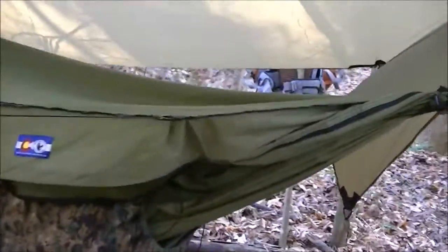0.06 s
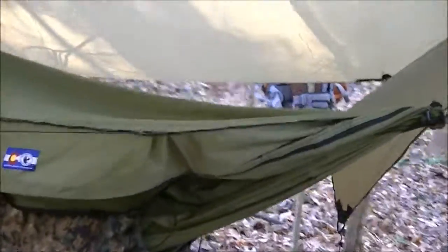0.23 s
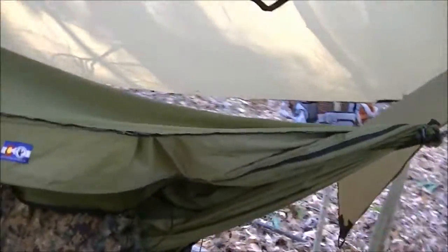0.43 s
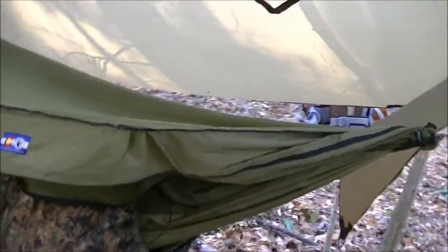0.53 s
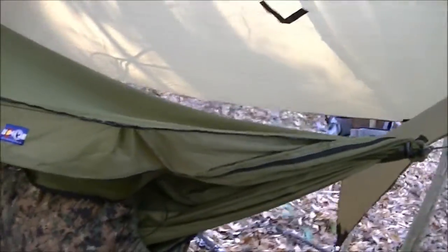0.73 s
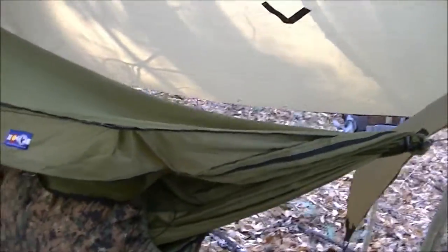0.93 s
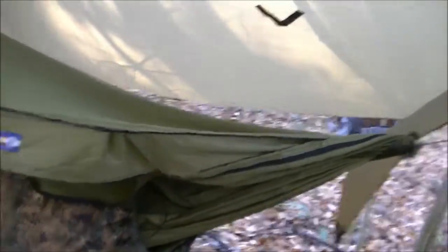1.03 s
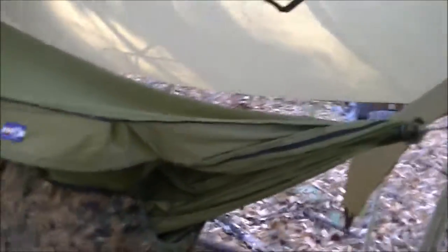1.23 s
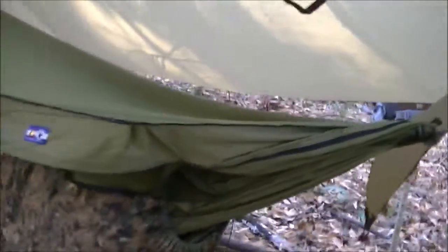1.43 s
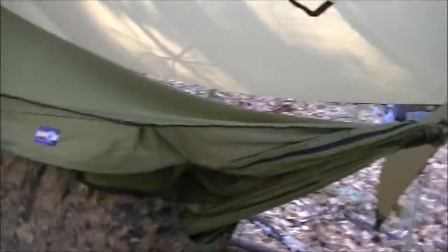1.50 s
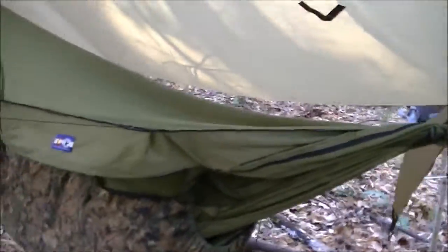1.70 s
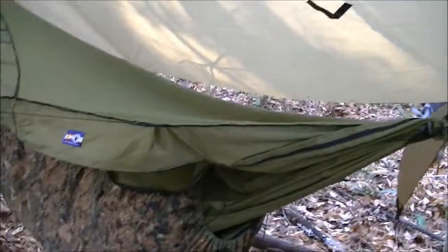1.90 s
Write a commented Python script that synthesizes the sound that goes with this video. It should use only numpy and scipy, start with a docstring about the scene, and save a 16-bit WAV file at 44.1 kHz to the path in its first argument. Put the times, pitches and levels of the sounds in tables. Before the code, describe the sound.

Dry leaves crunch and rustle underfoot, small twigs snapping and ticking, over a faint woodland hush

```python
"""Footsteps in dry leaf litter in quiet woods, heard by a hand-held camera with one microphone.
Under each step thousands of random leaf cracks mix with rubbing noise into coarse crunch and fine rustle.
Twigs and stiff leaves snap as short damped tones and tick high up, then scatter off the ground.
A thin unsteady rubbing tone sounds early on. Filtered noise makes the camera body's rumble in the hand,
a low hum and the hush of the woods; damped low sines are soft bumps on the body."""
import sys
import numpy as np
from scipy import signal
from scipy.fft import rfft, irfft, next_fast_len
from scipy.io import wavfile
from scipy.ndimage import uniform_filter1d, map_coordinates

SR = 44100
rng = np.random.default_rng(int(sys.argv[2]) if len(sys.argv) > 2 else 0)


def wrap_up_sound(samples):
    """Save the sound to the file named by the first command line argument, as 16-bit audio."""
    columns = np.atleast_2d(samples).T
    # keep every value between -1 and 1, then stretch to whole-number steps
    tamed = np.clip(columns, -1, 1)
    steps = np.round(tamed * 32767).astype(np.int16)
    wavfile.write(sys.argv[1], SR, steps)


N = 85995
SNAP_RISE_S = 0.00027  # time constant of the onset of snaps, cracks and ticks


def amp(db):
    """Gain of a level in dB."""
    return 10 ** (np.asarray(db) / 20)


def unit(x):
    """Scaled to rms 1."""
    return x / np.sqrt(np.mean(x ** 2) + 1e-20)


def along(points, hz):
    """Value at each frequency, from (Hz, value) points joined on a log axis."""
    point_hz, value = np.transpose(points)
    return np.interp(np.log(hz + 1), np.log(point_hz + 1), value)


def curves(rows):
    """One value per sample for each column after the time."""
    time_s, *columns = np.transpose(rows)
    return [np.interp(np.arange(N) / SR, time_s, column) for column in columns]


def wobble(rate):
    """A smooth random curve, rate knots a second."""
    knots = rng.standard_normal(N // 20)
    return map_coordinates(knots, [np.arange(N) * rate / SR])


def filtered(x, response):
    """x shaped by a gain for each frequency, without phase shift."""
    padded = next_fast_len(N + 8192)
    gain = response(np.fft.rfftfreq(padded, 1 / SR))
    return irfft(rfft(x, padded) * gain, padded)[..., :N]


def shaped_noise(spectrum):
    """Noise at rms 1 whose spectrum follows (Hz, dB) points."""
    return unit(filtered(rng.standard_normal(N), lambda hz: amp(along(spectrum, hz))))


def pings(start_s, size, hz, t60_s, rise_s, count):
    """Damped sines of count samples, with a soft onset, summed at their start times."""
    t = np.arange(count) / SR
    decay = amp(-60 * t / np.maximum(t60_s, 2e-4)[:, None])
    onset = 1 - np.exp(-t / rise_s)
    ring = size[:, None] * np.sin(2 * np.pi * hz[:, None] * t) * (decay * onset)
    at = np.round(start_s * SR).astype(int)[:, None] + np.arange(count)
    return np.bincount(at.ravel(), ring.ravel(), N + count)[:N]


def crackle(count, low_hz, high_hz, cycles, spread_db, rub_db, clump_db):
    """Leaf cracks of random time, pitch and size, evened in spectrum, over rubbing noise that clumps."""
    u = rng.random((count, 4))
    start_s = u[:, 0] * (N - 1) / SR
    hz = low_hz * (high_hz / low_hz) ** u[:, 1]
    sign = np.sign(u[:, 3] - .5)
    size = amp(-spread_db * np.log(u[:, 2] + 0.06)) * sign * hz  # few large, many small
    cracks = pings(start_s, size, hz, cycles / hz, rise_s=1e-4, count=256)
    spectrum = rfft(cracks)
    smooth = np.sqrt(uniform_filter1d(np.abs(spectrum) ** 2, size=801) + 1e-9)
    even = unit(irfft(spectrum / smooth, N))
    rubbing = amp(rub_db) * rng.standard_normal(N)
    return unit((even + rubbing) * amp(clump_db * wobble(54.57)))


def leaves():
    """Coarse crunch and fine rustle of crushed leaves, each following the pressure of the feet."""
    # pressure of the feet on the litter: time_s, coarse_level_db, fine_level_db
    tread = [(0, -50, -56), (.1, -58.5, -56), (.168, -56.5, -61.5), (.195, -61.5, -64.5),
             (.238, -45.5, -42.5), (.244, -45, -49), (.249, -44.5, -56), (.263, -54, -48.5),
             (.27, -48, -58), (.285, -57, -58), (.308, -48, -52.5), (.32, -40.5, -42.5),
             (.345, -41.5, -39.5), (.385, -40, -45.5), (.46, -52, -53), (.55, -48.5, -49), (.64, -50, -48),
             (.71, -52, -46), (.745, -42, -41.5), (.78, -48.5, -45.5), (.82, -42.5, -42.5),
             (.87, -48.5, -45.5), (.888, -39, -37), (.955, -32, -31), (.98, -36, -33.5),
             (1.01, -47.5, -45.5), (1.1, -53.5, -53), (1.19, -46.5, -49.5), (1.25, -41, -42.5),
             (1.29, -39.5, -42.5), (1.31, -42, -47.5), (1.38, -38.5, -39.5), (1.42, -32.5, -34),
             (1.455, -40, -41), (1.49, -49, -49.5), (1.55, -46, -47.5), (1.63, -47, -47.5),
             (1.7, -46, -51.5), (1.8, -52, -52), (1.87, -53.5, -60), (1.95, -54, -49)]
    # spectrum of the coarse crunch: frequency_hz, relative_level_db
    coarse_spectrum = [(150, -29), (250, -22), (291, -23.5), (565, -6.5), (1150, -2.5), (1460, -3),
                       (3220, -4), (5000, -3), (6500, 5), (11000, -120)]
    # spectrum of the fine rustle: frequency_hz, relative_level_db
    fine_spectrum = [(2000, 13), (3000, 1.5), (4500, -0.5), (6000, -1), (7700, -5.5), (11000, -9.5),
                     (14000, -14.5), (15900, -18.5)]
    split_hz = 3730  # crunch below, rustle above

    def above(hz):
        """Share of the power that goes to the rustle."""
        return 1 / (1 + (split_hz / (hz + 1)) ** 6)

    coarse_db, fine_db = curves(tread)
    coarse = crackle(count=2500, low_hz=432, high_hz=5260, cycles=5.8, spread_db=2.5, rub_db=-2, clump_db=2.0)
    fine = crackle(count=6000, low_hz=2380, high_hz=13900, cycles=5.2, spread_db=5.0, rub_db=0.5, clump_db=1.0)
    coarse = unit(filtered(coarse, lambda hz: amp(along(coarse_spectrum, hz)) * np.sqrt(1 - above(hz))))
    fine = unit(filtered(fine, lambda hz: amp(along(fine_spectrum, hz)) * np.sqrt(above(hz))))
    return amp(coarse_db) * coarse + amp(fine_db) * fine


def snaps():
    """Each snap rings a body tone and an overtone, with a crack of ten short pings spread over the band."""
    # snapping twigs and stiff leaves, levels nominal before the onset and the low cut:
    # start_s, level_db, body_hz, body_t60_s, overtone_hz, overtone_level_db (over the body)
    snap_list = [(.161, -44, 1330, .006, 2600, -8), (.176, -29.5, 1750, 0.011, 2770, -14),
                 (.236, -29.5, 1770, .012, 2980, -4), (.317, -39, 1010, 0.0051, 2230, 1.5),
                 (.348, -21.5, 2240, 0.0032, 3880, 5), (.373, -35, 1310, 0.0045, 3030, 12),
                 (.408, -27, 1500, 0.0046, 2600, 4), (.52, -35, 1870, 0.0069, 3500, -4),
                 (.5995, -13, 1930, 0.0022, 3530, 5.5), (0.601, -27.5, 930, 0.0042, 6260, -1),
                 (.663, -36, 5060, 0.0041, 9000, 0), (.864, -31, 4970, 0.0068, 7000, -8),
                 (.885, -19.5, 2920, 0.0067, 5370, 1), (1.035, -32, 1300, 0.0063, 1900, -1),
                 (1.12, -22, 1350, 0.0031, 2600, 6), (1.123, -28.5, 5060, 0.0048, 7950, -2),
                 (1.247, -24, 1970, .005, 3480, -15), (1.284, -25, 2600, 0.0074, 1500, -8),
                 (1.368, -21, 1700, 0.0069, 3000, -17), (1.385, -24, 1850, 0.01, 3180, -21),
                 (1.3975, -32, 1700, 0.008, 4850, 12.5), (1.4012, -20.5, 1540, 0.0081, 2400, 6),
                 (1.409, -17.5, 1090, 0.0023, 2500, 5), (1.4135, -23, 1450, 0.018, 2640, -5),
                 (1.4165, -17.5, 1800, 0.0034, 2800, 1), (1.419, -15, 1850, 0.0097, 2840, -5),
                 (1.4245, -23, 2550, 0.01, 6120, 1.5), (1.4495, -18, 1900, .008, 1000, -4),
                 (1.472, -38, 946, 0.023, 1520, -5), (1.546, -26, 2800, 0.0069, 5500, -3),
                 (1.618, -23.5, 2900, 0.0027, 7040, 5.5), (1.683, -29, 2000, 0.0049, 3020, 1),
                 (1.724, -28.5, 1800, .004, 3500, -3), (1.769, -25, 3050, 0.005, 1920, -12),
                 (1.793, -34, 3540, 0.0056, 2000, -7)]
    crack_db, crack_tilt_db, crack_t60_s = -13, -.6, 0.0032  # level over the body; tilt per ping
    crack_low_hz, crack_step = 800, 1.3  # lowest pitch; pitch ratio from ping to ping

    start_s, db, hz, t60_s, over_hz, over_db = np.transpose(snap_list)
    body = pings(start_s, amp(db), hz, t60_s, SNAP_RISE_S, count=1500)
    overtone = pings(start_s, amp(db + over_db), over_hz, 0.74 * t60_s, SNAP_RISE_S, count=1500)
    x = body - overtone
    crack_t60s = np.full(len(start_s), crack_t60_s)
    draws = rng.random((len(start_s), 10, 2)).transpose(1, 2, 0)
    for k, (detune, coin) in enumerate(draws):
        crack_hz = np.minimum(crack_low_hz * crack_step ** (k + detune), 15000)
        size = amp(db + crack_db + crack_tilt_db * k) * np.sign(coin - .5)
        x = x + pings(start_s, size, crack_hz, crack_t60s, SNAP_RISE_S, count=300)
    return x


def ticks():
    """Thin high ticks, each four short damped sines at randomly detuned pitches."""
    # high ticks, level nominal and each sine at half of it: start_s, level_db
    tick_list = [(0.2109, -34), (0.387, -25), (0.5985, -30), (1.1209, -32), (1.5439, -39), (1.6014, -35),
                 (1.6162, -32), (1.6985, -31), (1.729, -42), (1.7366, -31), (1.7684, -28.5), (1.7804, -37),
                 (1.8264, -57), (1.8886, -33.5), (1.9106, -37), (1.9275, -43)]
    tick_hz, tick_t60_s = 11600, 0.0035  # pitch before ratio and detuning
    start_s, db = np.transpose(tick_list)
    t60s = np.full(len(start_s), tick_t60_s)
    x = np.zeros(N)
    for ratio in (.8, .93, 1.08, 1.2):
        hz = tick_hz * ratio * (0.9 + 0.12 * rng.random(len(start_s)))
        x = x + pings(start_s, amp(db) / 2, hz, t60s, SNAP_RISE_S, count=300)
    return x


def off_the_ground(x):
    """Adds a short noisy scatter off the ground, then cuts the lows that leaves and twigs cannot radiate."""
    ground_t60_s, ground_db, litter_cut_hz = 0.021, -6, 490
    t = np.arange(3000) / SR
    tail = rng.standard_normal(len(t)) * amp(-60 * t / ground_t60_s) * (t > .001)
    tail = tail / np.linalg.norm(tail)
    x = x + amp(ground_db) * signal.fftconvolve(x, tail)[:N]
    low_cut = signal.butter(3, litter_cut_hz, "high", fs=SR, output="sos")
    return signal.sosfilt(low_cut, x)


def rub():
    """A narrow rubbing tone: a sine whose pitch wavers and whose level flutters at random."""
    # level of the rubbing tone before its flutter: time_s, level_db
    rub_level = [(.17, -80), (.2, -57), (.24, -56), (.27, -55), (.31, -54), (.36, -56), (.41, -56),
                 (.45, -57), (.5, -80)]
    centre_hz, waver_hz, flutter_db = 1890, 54, 3
    phase = 2 * np.pi * np.cumsum(centre_hz + waver_hz * wobble(120.7)) / SR
    return amp(curves(rub_level)[0] + flutter_db * wobble(71)) * unit(np.sin(phase))


def handling_rumble():
    """Camera body rumbling in the hand: low noise shaped by the body, which swells and stops."""
    # handling level: time_s, level_db
    handling = [(0.3, -69), (0.328, -72), (0.382, -57), (0.402, -62), (0.452, -52), (0.48, -68),
                (0.534, -46.5), (0.592, -47.5), (0.62, -80), (0.64, -71)]
    # spectrum of the camera body: frequency_hz, relative_level_db
    body_spectrum = [(40, -40), (70, -17), (110, -11.5), (145, 0), (230, -2), (300, -17), (400, -25),
                     (600, -80)]
    fade_in = [(handling[0][0] - .05, -100)]
    fade_out = [(handling[-1][0] + .02, -100)]
    level_db = curves(fade_in + list(handling) + fade_out)[0]
    return amp(level_db) * shaped_noise(body_spectrum)


def bumps():
    """Soft bumps on the camera body: low damped sines with a gentle onset."""
    # bumps, level nominal before the onset: start_s, level_db, pitch_hz, t60_s
    bump_list = [(0.1748, -40.5, 348, .035), (.222, -59.5, 95, 0.063), (1.295, -48, 253, 0.11),
                 (1.51, -47.5, 123, 0.049), (1.621, -55, 114, 0.088), (1.626, -46, 335, 0.054),
                 (1.755, -58.5, 120, 0.093)]
    start_s, db, hz, t60_s = np.transpose(bump_list)
    return pings(start_s, amp(db), hz, t60_s, rise_s=0.0018, count=5000)


def hum():
    """A wavering low hum: a narrow band of noise whose level rises and falls."""
    # level of the hum: time_s, level_db
    hum_level = [(0, -64), (.05, -58.5), (.13, -76), (.24, -70), (.33, -57), (.47, -68), (.67, -76),
                 (.94, -68), (1.19, -70), (1.4, -57.5), (1.46, -76), (1.7, -67), (1.75, -58.5),
                 (1.9, -60.5), (1.95, -52)]
    centre_hz, width_hz = 359, 79  # gain is half at this distance either side
    band = filtered(rng.standard_normal(N), lambda hz: 1 / (1 + ((hz - centre_hz) / width_hz) ** 4))
    return amp(curves(hum_level)[0]) * unit(band)


def woods():
    """The steady hush of the woods: noise with a fixed spectrum and level."""
    # spectrum of the hush: frequency_hz, relative_level_db
    hush_spectrum = [(30, -51), (60, -16), (120, -7.5), (310, 2), (1380, 0.5), (5280, -22.5), (11300, -30),
                     (15900, -16)]
    hush_db = -61.5
    return amp(hush_db) * shaped_noise(hush_spectrum)


def scene():
    """One microphone feeds both channels."""
    litter = leaves() + off_the_ground(snaps() + ticks()) + rub()
    camera = handling_rumble() + bumps() + hum()
    mono = litter + camera + woods()
    return np.array([mono, mono])


def record(dry):
    """The microphone drops the deep bass; the camera keeps nothing above its band limit."""
    mic_cut_hz, top_hz = 58, 15830
    return filtered(dry, lambda hz: (hz < top_hz) / np.sqrt(1 + (mic_cut_hz / (hz + 1)) ** 4))


dry = scene()
out = record(dry)
wrap_up_sound(out)
```